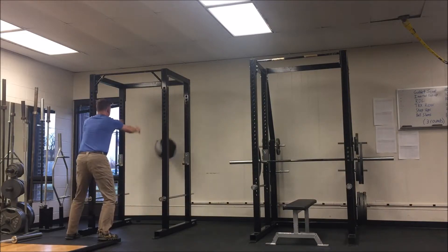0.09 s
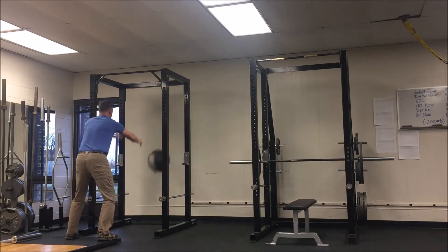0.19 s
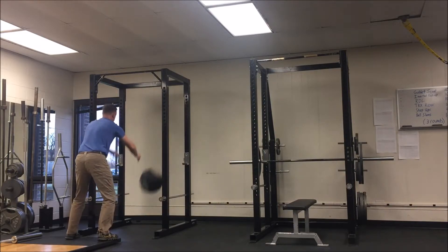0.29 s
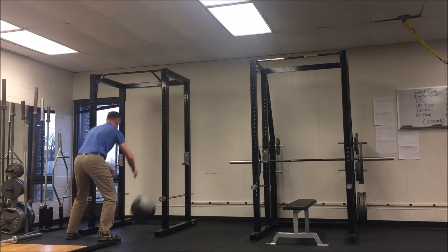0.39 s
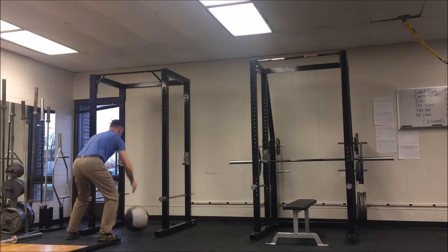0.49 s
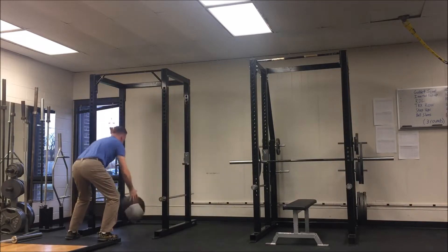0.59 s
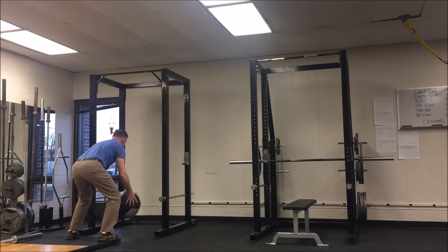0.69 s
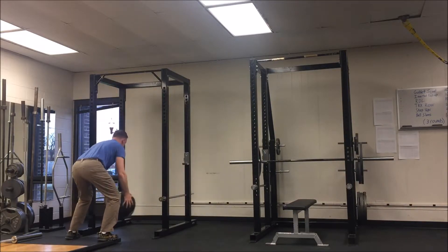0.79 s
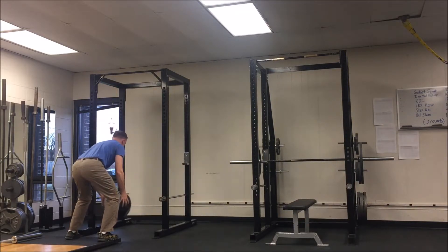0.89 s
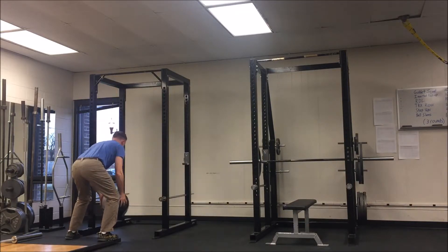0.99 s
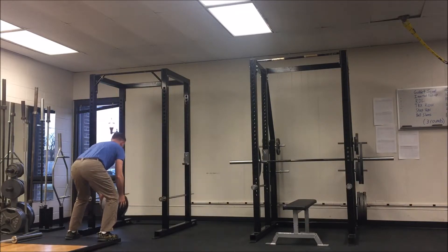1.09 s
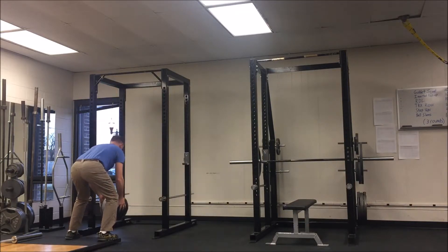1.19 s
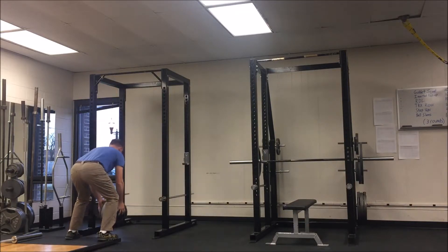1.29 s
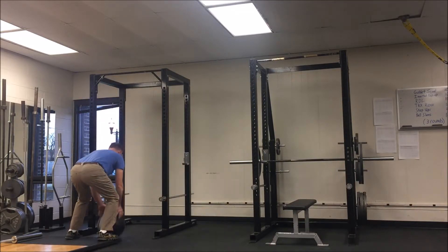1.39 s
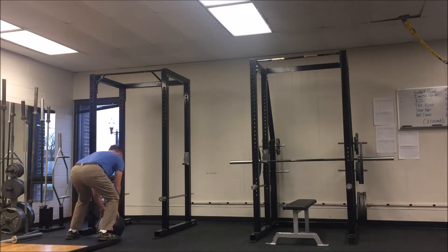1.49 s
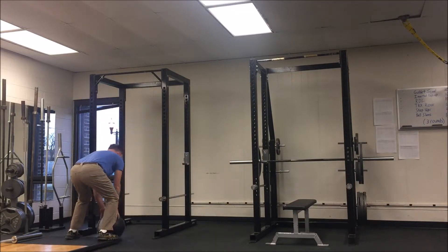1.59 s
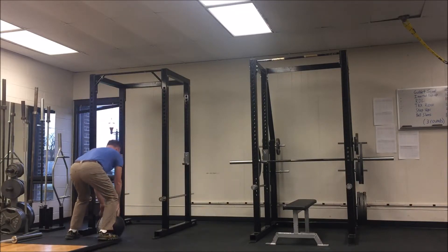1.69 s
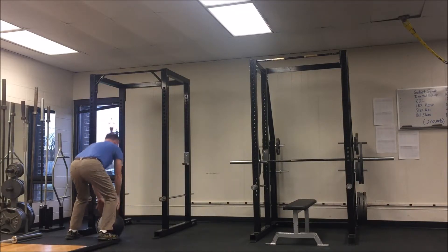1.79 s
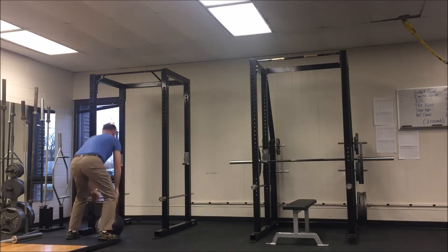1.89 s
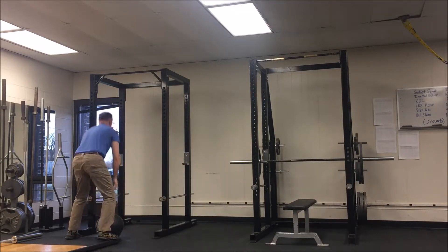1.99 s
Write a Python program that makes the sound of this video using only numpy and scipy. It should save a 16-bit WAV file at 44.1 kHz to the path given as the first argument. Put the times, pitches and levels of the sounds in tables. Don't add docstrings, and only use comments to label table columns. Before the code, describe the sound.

A heavy exercise ball slams a block wall, booms, then thuds onto rubber floor in a gym

```python
import sys
import numpy as np
from scipy import signal
from scipy.io import wavfile

SR = 44100
rng = np.random.default_rng(int(sys.argv[2]) if len(sys.argv) > 2 else 0)


def waveform_to_disk(signal):
    frames = np.transpose(np.atleast_2d(signal))
    scaled = np.clip(frames, -1, 1) * 32767
    samples = np.round(scaled).astype(np.int16)
    wavfile.write(sys.argv[1], SR, samples)


def gain_from_decibels(decibels):
    exponent = np.asarray(decibels, float) / 20
    return 10 ** exponent


N = 88200

# start in seconds, room level in dB, contact time in seconds, slap level in dB,
# late room field in dB relative to the early one.
BLOWS = [
    (0.2000, -16.5, 0.017, -17.5, -8),
    (0.6290, -22, 0.013, -18.5, -6.5),
    (1.5961, -31.5, 0.012, -39, -10),
]
# frequency in Hz, level in dB per Hz.
WALL_COLOUR = [(35, -51), (60, -19), (98, -9.5), (287, -3.5), (1170, -12), (1580, -16.5), (1820, -15.5),
               (9130, -26), (16000, -42)]
FLOOR_COLOUR = [(35, -29), (60, 2.5), (103, -23.5), (193, -5), (469, -9), (553, -4), (842, -11.5),
                (8320, -25), (16000, -44)]
PAT_COLOUR = [(120, -34.5), (300, -1), (560, 1), (760, -3), (1500, -5.5), (3600, -13), (6640, -16.5),
              (16000, -36)]
# frequency in Hz, level in dB per Hz.
SLAP_COLOURS = [
    [(350, -31.5), (600, -0.5), (1530, -2.5), (3730, -15.5), (7020, -14), (16000, -31.5)],
    [(500, -18.5), (950, 0), (2200, 0), (6000, -6), (16000, -16)],
    [(450, -11), (750, 3.5), (2000, 1), (7500, -12.5), (16000, -23.5)],
]
FIRST_SLAP_DB = [0.5, 6.5, -0.5]
SLAPS_PER_S, SLAP_SPREAD_DB = 2500, 1
# delay in seconds, frequency in Hz, level in dB, sign.
PUSHES = [
    (.0063, 1100, -8, -1),
    (.0146, 500, -16, -1),
    (.0217, 600, -19, 1),
]
# frequency in Hz, level in dB, t60 in seconds.
BODY_MODES = [
    [(128.2, -20, .2), (184, -15, 0.066), (193, -18, 0.26), (271.8, -17, 0.39), (304.5, -16, 0.29),
     (516.5, -18.5, .3), (684.6, -23.5, 0.33), (1020, -16, 0.042), (1536, -18, .07)],
    [(73.4, -28.5, .4), (145, -18.5, 0.13), (178.2, -12.5, .15), (190.3, -27.5, 0.43), (333, -25.5, 0.3),
     (546, -22, 0.25), (739, -19.5, 0.14), (973, -25.5, .1)],
    [(322, -26.5, 0.32), (353.5, -31, 0.32), (474, -30, 0.19), (751, -28, 0.13)],
]
# delay in seconds, swell in seconds.
BODY_ONSETS = [
    (0.0008, .001),
    (.0133, .002),
    (.0198, .001),
]
# frequency in Hz, level in dB, t60 in seconds.
SKIN_MODES = [
    (886, -22.5, 0.17),
    (151.3, -20.5, .1),
    (764, -27.5, .12),
]
# delay in seconds, level in dB.
ECHOES = [(.0043, -19), (.0091, -18), (0.0175, -18), (0.0228, -14)]
# frequency in Hz, t60 in seconds.
EARLY_T60 = [(80, .5), (300, 0.44), (1000, 0.37), (4000, 0.28), (9000, 0.18), (15000, 0.13)]
LATE_T60 = [(80, 3.6), (300, 1.02), (1000, 0.76), (4000, 0.63), (9000, 0.32), (15000, .4)]
BUILD_S, LOW_BUILD_CYCLES = 0.0023, 3.06
# frequency in Hz, dB after the wall hit, dB after the drop, t60 in seconds.
BOOM_MODES = [(46.44, -14, -29.5, .35), (39.6, -28.5, -39, 2.4), (47, -51.5, -33.5, 1.2),
              (62, -42.5, -28.5, 0.54)]
BOOM_DELAY_S, BOOM_SWELL_S = 0.022, 0.018
# time in seconds, level in dB.
DRAG_LEVEL = [(0.882, -90), (0.886, -51), (0.91, -52), (0.93, -53), (0.99, -54.5), (1.02, -65), (1.05, -82)]
# frequency in Hz, level in dB per Hz.
DRAG_COLOUR = [(500, -14.5), (1500, -10), (4000, -10.5), (9000, -14), (16000, -17.5)]
# centre in seconds, level in dB, length in seconds.
SHUFFLES = [(0.193, -39.5, 0.0084), (0.61, -42, 0.022), (1.082, -45.5, 0.0039), (1.176, -64, 0.0095),
            (1.597, -49, 0.053), (1.79, -51, 0.052), (1.82, -44.5, .015), (2.0, -74, 0.0077)]
# frequency in Hz, level in dB per Hz.
SHUFFLE_COLOUR = [(100, 4), (300, 1.5), (1000, -18.5), (4000, -34.5), (15000, -40.5)]
FADING_DB, FADING_SPEED = -40.5, 1.1
# frequency in Hz, level in dB per Hz.
AIR_COLOUR = [(25, -21), (50, -8), (90, -0.5), (170, -0.5), (260, -16), (420, -12.5), (750, -34),
              (1300, -39)]
AIR_DB = -44.5
# frequency in Hz, level in dB per Hz.
HISS_COLOUR = [(700, -1.5), (2000, -5), (5000, -10), (10000, -15.5), (16000, -19.5)]
HISS_DB = -71
# start in seconds, depth in dB, recovery in seconds.
GAIN_DIPS = [
    (1.045, -3, .03),
    (1.836, -8, .045),
]
# centre in seconds, lower edge in Hz, depth in dB.
DROPOUTS = [(0.133, 4500, -9), (0.35, 7040, -4), (0.733, 5500, -5), (0.86, 5930, -9), (0.903, 4430, -15),
            (1.053, 5500, -5), (1.755, 4030, -6), (1.82, 3960, -16)]
DROPOUT_S, TOP_HZ = 0.011, 16600
EDGES = 28 * 2 ** np.arange(0, 9.6, .5)


def rms_one(x):
    return x / np.sqrt(np.mean(x ** 2) + 1e-20)


def at_hz(points, hz):
    table_hz, value = np.transpose(points)
    return np.interp(np.log(hz), np.log(table_hz), value)


def drift(rate):
    r = np.exp(-80 * np.pi * rate / SR)
    slow = signal.lfilter([1], [1, -2 * r, r * r], rng.standard_normal(N // 40 + 2002))[2000:]
    return np.interp(np.arange(N) / 40, np.arange(len(slow)), rms_one(slow))


def bank(x, gain):
    out = 0
    for k, (lo, hi) in enumerate(zip(EDGES, EDGES[1:])):
        band = signal.butter(2, [lo, hi], "band", fs=SR, output="sos")
        out = out + gain(np.sqrt(lo * hi)) * signal.sosfilt(band, x[k % 2])
    return out


def noise(colour, patchy_db):
    def gain(hz):
        return gain_from_decibels(at_hz(colour, hz) + patchy_db * drift(9))
    return rms_one(bank(rng.standard_normal((2, N)), gain))


def ring(start_s, hz, db, t60, swell_s):
    t = np.maximum(np.arange(N) / SR - start_s, 0)
    envelope = gain_from_decibels(db - 60 * t / t60) * (1 - np.exp(-t / swell_s))
    return envelope * np.sin(2 * np.pi * hz * t)


def slap_patter(contact_s, first_db, colour):
    t = np.arange(N) / SR
    touches = rng.random(N) < SLAPS_PER_S / SR
    strength = gain_from_decibels(SLAP_SPREAD_DB * np.minimum(rng.exponential(1, N), 3))
    slaps = touches * strength * rng.choice([-1, 1], N)
    slaps[0] = gain_from_decibels(first_db)
    slaps = slaps * np.exp(-(t / contact_s) ** 4) + 1e-18

    def gain(hz):
        return gain_from_decibels(at_hz(colour, hz)) * min(1, hz / colour[0][0]) ** 2
    patter = bank([slaps, slaps], gain)
    return patter / np.std(patter[:700])


def body_push(delay_s, hz, db, sign):
    u = (np.arange(N) / SR - delay_s) * hz * np.pi
    return gain_from_decibels(db) * sign * 2 * u * np.exp(-u ** 2)


def room(colour, hold_s, late_db):
    t = np.arange(N) / SR
    after = np.maximum(t - hold_s, 0)

    def gain(hz):
        build = 1 - np.exp(-t / (BUILD_S + LOW_BUILD_CYCLES / hz))
        early = gain_from_decibels(-60 * after / at_hz(EARLY_T60, hz))
        late = gain_from_decibels(late_db - 60 * after / at_hz(LATE_T60, hz))
        return gain_from_decibels(at_hz(colour, hz)) * build * np.hypot(early, late)
    out = bank(rng.standard_normal((2, N)), gain)
    return out / np.sqrt(np.mean(out[:1500] ** 2))


def blows():
    out, t = np.zeros(N), np.arange(N) / SR
    room_colours = [WALL_COLOUR, FLOOR_COLOUR, PAT_COLOUR]
    for k, (start_s, room_db, contact_s, slap_db, late_db) in enumerate(BLOWS):
        sound = gain_from_decibels(slap_db) * slap_patter(contact_s, FIRST_SLAP_DB[k], SLAP_COLOURS[k])
        sound = sound + body_push(*PUSHES[k])
        sound = sound + gain_from_decibels(room_db) * room(room_colours[k], contact_s, late_db)
        echoes = sum(gain_from_decibels(db) * np.interp(t - lag, t, sound, left=0) for lag, db in ECHOES)
        i = int(start_s * SR)
        out[i:] += (sound + echoes)[:N - i]
        delay_s, swell_s = BODY_ONSETS[k]
        for hz, db, t60 in BODY_MODES[k]:
            out += ring(start_s + delay_s, hz, db, t60, swell_s)
        out += ring(start_s, *SKIN_MODES[k], swell_s=0.0014)
    return out


def boom():
    out = np.zeros(N)
    for hz, wall_db, floor_db, t60 in BOOM_MODES:
        for blow, db in zip(BLOWS[:2], (wall_db, floor_db)):
            out += ring(blow[0] + BOOM_DELAY_S, hz, db, t60, BOOM_SWELL_S)
    return out


def drag():
    level_db = np.interp(np.arange(N) / SR, *np.transpose(DRAG_LEVEL), left=-200, right=-200)
    return gain_from_decibels(level_db) * noise(DRAG_COLOUR, patchy_db=0.5)


def shuffles():
    t = np.arange(N) / SR
    swell = sum(gain_from_decibels(db) * np.exp(-((t - s) / length) ** 2) for s, db, length in SHUFFLES)
    return swell * noise(SHUFFLE_COLOUR, patchy_db=1.0)


def fading_tail():
    t = np.arange(N) / SR

    def gain(hz):
        return gain_from_decibels(at_hz(SHUFFLE_COLOUR, hz) - 60 * FADING_SPEED * t / at_hz(EARLY_T60, hz))
    fading = bank(rng.standard_normal((2, N)), gain)
    return gain_from_decibels(FADING_DB) * fading / np.std(fading[:1000])


def ventilation():
    return gain_from_decibels(AIR_DB) * noise(AIR_COLOUR + [(4000, -70)], patchy_db=1.0)


def microphone_hiss():
    return gain_from_decibels(HISS_DB) * noise([(300, -30)] + HISS_COLOUR, patchy_db=0.0)


def scene():
    ball = blows() + boom() + drag()
    background = shuffles() + fading_tail() + ventilation() + microphone_hiss()
    return (ball + background)[None]


def top_cut(x):
    return signal.sosfilt(signal.butter(12, 16750, fs=SR, output="sos"), x)


def record(dry):
    t = np.arange(N) / SR
    gain_db = np.zeros(N)
    for s, db, back_s in GAIN_DIPS:
        attack = np.clip((t - s) / 0.018, 0, 1)
        gain_db += db * attack * np.exp(-(np.maximum(t - s, 0) / back_s) ** 2)
    x = dry * gain_from_decibels(gain_db)
    for s, hz, db in DROPOUTS:
        treble = signal.sosfiltfilt(signal.butter(4, hz, "high", fs=SR, output="sos"), x)
        x = x - treble * (1 - gain_from_decibels(db * np.exp(-((t - s) / DROPOUT_S) ** 2)))
    mix = signal.sosfilt(signal.cheby2(12, 60, TOP_HZ, fs=SR, output="sos"), x)
    return top_cut(mix)


dry = scene()
out = record(dry)
waveform_to_disk(out)
```